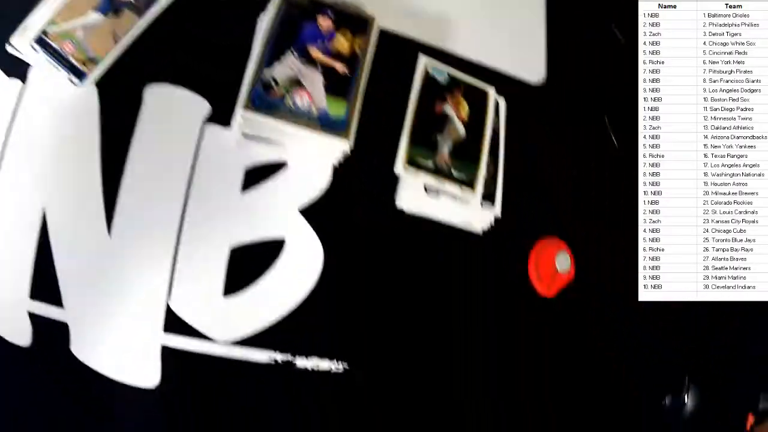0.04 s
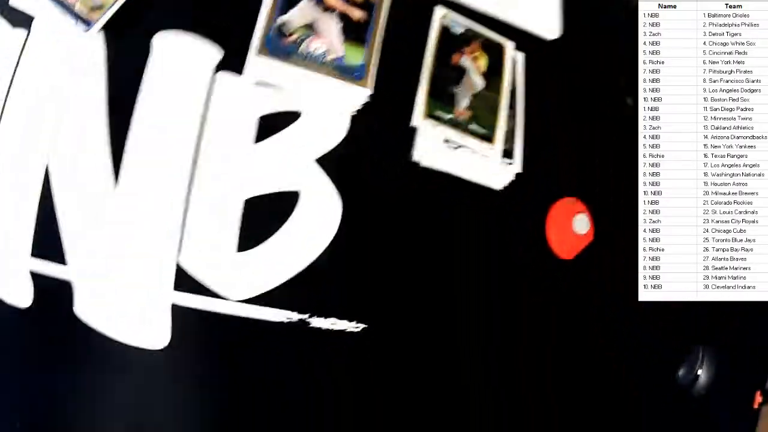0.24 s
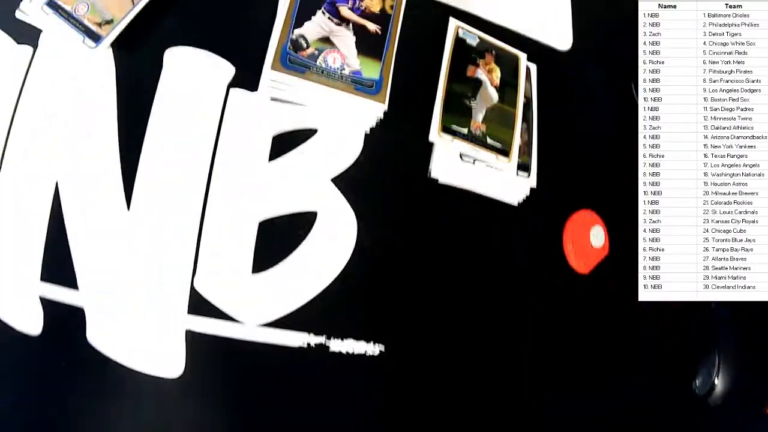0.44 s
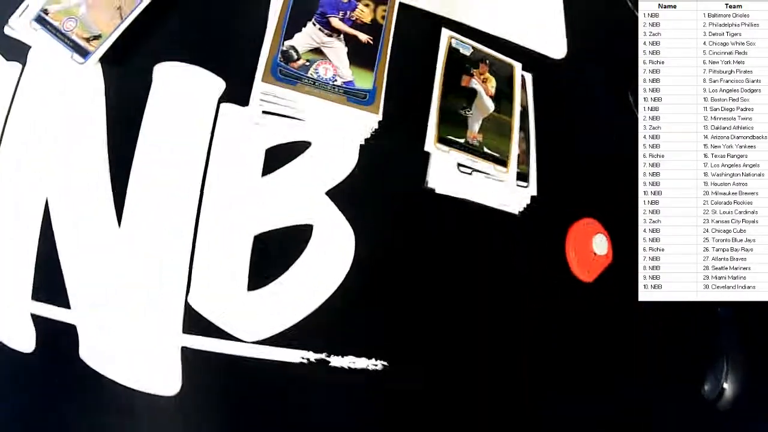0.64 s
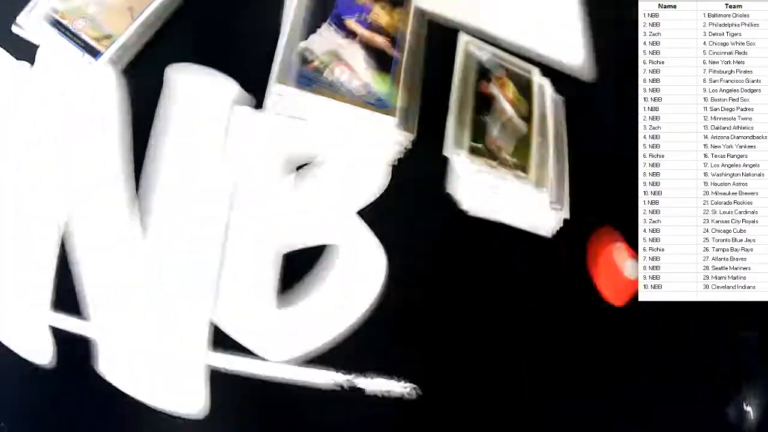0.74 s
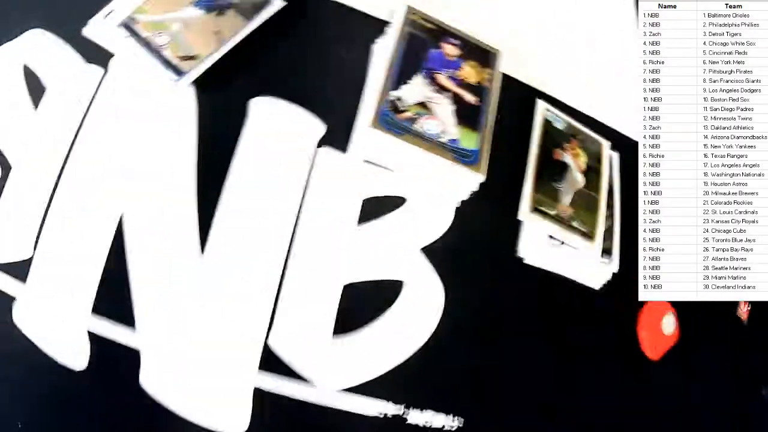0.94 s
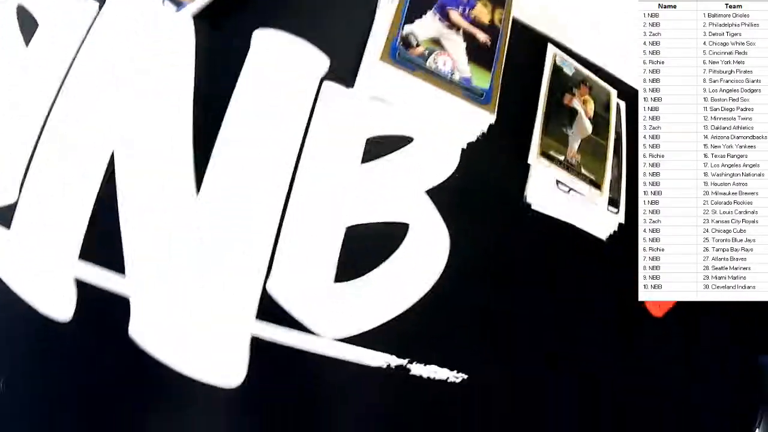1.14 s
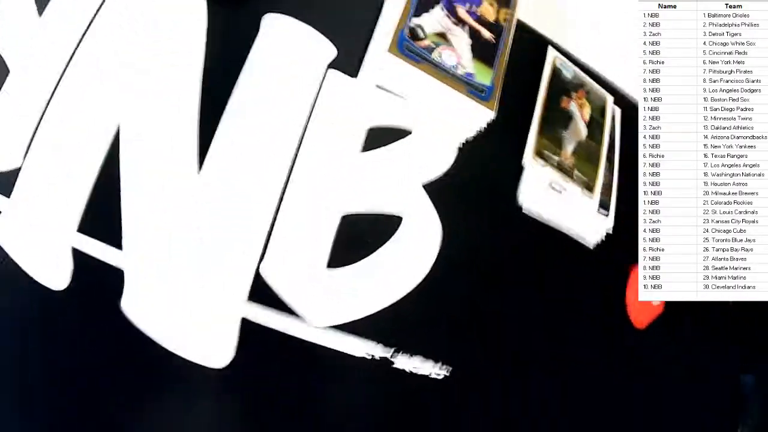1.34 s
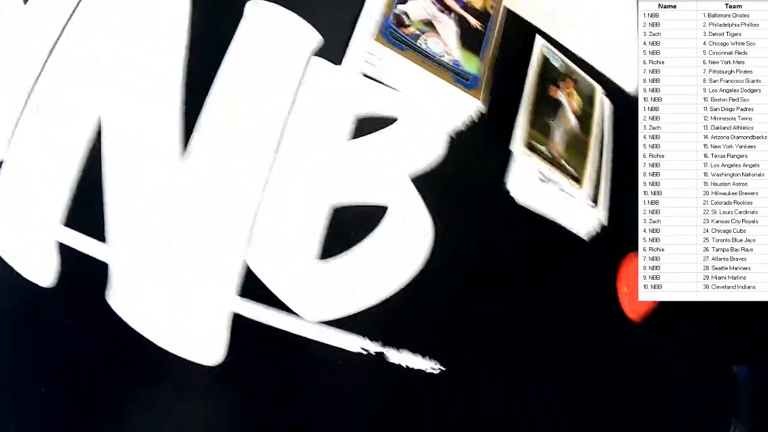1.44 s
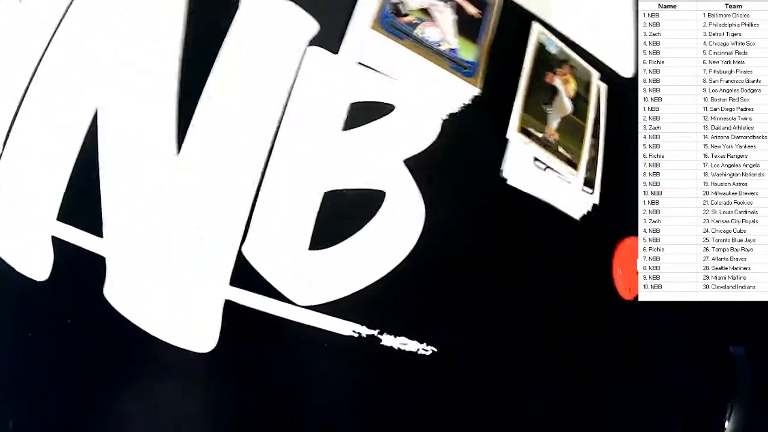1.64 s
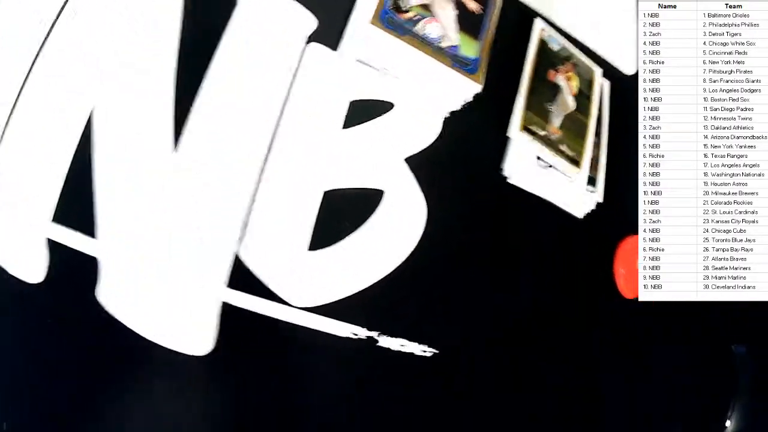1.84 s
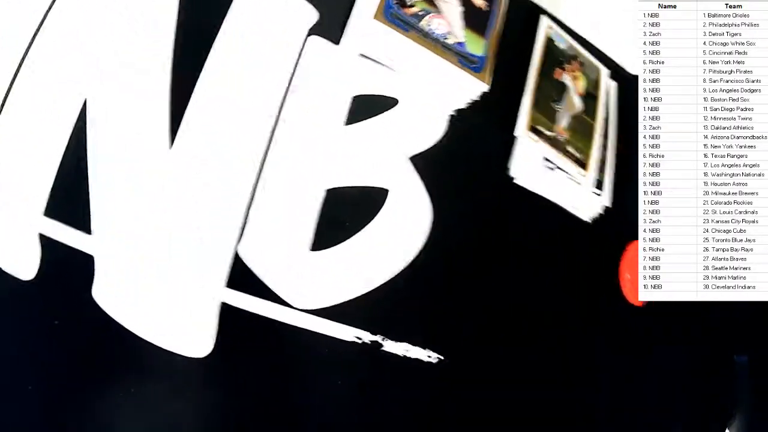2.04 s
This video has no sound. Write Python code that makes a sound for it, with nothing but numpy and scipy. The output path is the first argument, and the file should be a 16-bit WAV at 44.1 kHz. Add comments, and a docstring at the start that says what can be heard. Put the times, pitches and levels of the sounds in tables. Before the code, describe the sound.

Close handling of a camera on a jointed mount: soft rubbing, a hard plastic snap, a rattling burst of knocks and ratchet clicks, then quiet, one smaller click and faint creaks, in a quiet indoor room.

```python
"""A quiet room, with a camera on a jointed mount gripped and re-aimed right at its built-in microphone.
Behind it lie room tone, hiss and mains hum, made from shaped noise and steady sines.
Thumps and sways ring the mount's low modes; squeaks and groans are unsteady sines of the arm.
Rubs feed random stick-slip clicks to the plastic housing's modes; snaps, ratchets and knocks strike them.
A faint decaying noise tail adds the walls, and the hardest knocks overload the microphone."""
import sys
import numpy as np
from scipy import signal
from scipy.fft import rfft, irfft
from scipy.io import wavfile

SR = 44100
rng = np.random.default_rng(int(sys.argv[2]) if len(sys.argv) > 2 else 0)


def unload_audio(sound):
    """Save the sound as a 16-bit wav file, at the path given as the first command line argument."""
    columns = np.transpose(np.atleast_2d(sound))
    # keep every value between -1 and 1, then stretch to whole-number steps
    steps = np.round(np.clip(columns, -1, 1) * 32767)
    wavfile.write(sys.argv[1], SR, steps.astype(np.int16))


N = 92610
T = np.arange(N) / SR

# Housing modes in four families, from the shell's hollow knock up to its fine tick.
# Each row: frequency in Hz, relative level in dB, t60 in seconds when knocked.
HOLLOW = [(518.3, -17.5, 0.042), (700.4, -7.5, 0.031), (772.3, -2, 0.025), (871, -1.5, .038),
          (967.5, 0.5, .032), (1154, -5.5, 0.036), (1244, -15, 0.028)]
CLACK = [(1707, -8, 0.018), (1849, -3, 0.023), (2006.6, -0.5, 0.022), (2151, 0, 0.019), (2313, -5, .038),
         (2702, -7, 0.024), (2979, -10, 0.049)]
RING = [(3260, -11, .026), (3680, -6, .022), (3785, 0, .036), (3870, -1, .028), (4000, -8, .02)]
TICK = [(4800, -2, .006), (5400, 0, .008), (6500, -5, .005), (7200, -5, .006), (8100, -4, .009),
        (8950, -5, .008), (11200, -5, .008), (12500, -10, .004)]
FAMILIES = (HOLLOW, CLACK, RING, TICK)
# Span of each family. Each row: low edge in Hz, high edge in Hz.
FAMILY_BANDS_HZ = [(400, 1840), (1600, 2509), (3150, 4300), (4700, 40000)]

COLOUR_SPREAD_DB = 2.5  # mode strengths differ from blow to blow
GRIP_DETUNE = 0.008  # share by which the changing grip shifts each mode
PHASE_SPREAD_RAD = 0.5


def from_db(db):
    """Decibels to gain."""
    return 10 ** (np.asarray(db) / 20)


def rms_one(x):
    """Scale to an rms of one."""
    return x / np.sqrt(np.mean(x ** 2) + 1e-20)


def through(x, response):
    """Pass a signal through an impulse response."""
    return signal.fftconvolve(x, response)[:N]


def add(out, start, x):
    """Mix x into out from a start in seconds, held inside the scene."""
    i = int(np.clip(start * SR, 0, N - 1))
    out[i:i + len(x)] += x[:N - i]


def band(x, edges_hz, order=3):
    """Keep the sound between two frequencies."""
    edges_hz = np.clip(edges_hz, 10, 0.45 * SR)
    return signal.sosfilt(signal.butter(order, edges_hz, "band", fs=SR, output="sos"), x)


def struck(modes, edges_hz, spread_db=0, detune=0, size=11000, count=200):
    """Decaying modes after one varied blow, with unit rms over the first count samples."""
    t = T[:size]
    ringing = np.zeros(size)
    for k, (hz, db, t60) in enumerate(modes):
        strength, shift, phase = rng.normal(size=3)
        decay = from_db(db + spread_db * strength - 60 * t / t60)
        angle = 2 * np.pi * hz * (1 + detune * shift) * t + PHASE_SPREAD_RAD * phase
        ringing += (-1) ** k * decay * np.sin(angle)  # neighbouring modes alternate in sign
    ringing = band(ringing, edges_hz)
    return ringing / np.sqrt(np.mean(ringing[:count] ** 2))


def background():
    """Room tone and microphone hiss are shaped noise; mains hum is a few steady sines."""
    # Spectrum of the quiet room. Each row: frequency in Hz, relative level in dB.
    floor = [(25, -8.5), (87, -13.5), (190, -11), (285, -18.5), (380, -11), (1150, -13), (1600, -23.5),
             (2400, -12.5), (2900, -29), (3850, -20), (4700, -34.5), (13000, -28), (16000, -45.5)]
    # Mains hum. Each row: frequency in Hz, rms level in dB.
    hum_lines = [(59.5, -70.5), (119, -79), (241, -81.5)]
    floor_db = -67.5  # rms
    hz, db = np.transpose(floor)
    log_hz = np.log(np.fft.rfftfreq(N, 1 / SR) + 1)
    shape = from_db(np.interp(log_hz, np.log(hz), db))
    hiss = from_db(floor_db) * rms_one(irfft(rfft(rng.standard_normal(N)) * shape, N))
    hum = sum(from_db(level) * rms_one(np.sin(2 * np.pi * f * T)) for f, level in hum_lines)
    return hiss + hum


def room(x):
    """Diffuse reflections from the walls: a faint, decaying noise tail."""
    room_db, room_t60_s = -24.5, 0.11
    tail = rng.standard_normal(N) * from_db(-60 * T / room_t60_s)
    return from_db(room_db) * through(x, tail / np.linalg.norm(tail))


def mount():
    """Shoves ring the mount's low modes as thumps, and the whole arm rocks at one slow mode."""
    # Low modes of the mount. Each row: frequency in Hz, relative level in dB, t60 in seconds.
    mount_modes = [(56.6, -12, 0.089), (123, 6, 0.047), (181, -1.5, 0.1), (252, 2.5, 0.048),
                   (320.5, 1, 0.086), (392, 6.5, 0.067)]
    # Thumps are soft, so they keep to one band: low edge in Hz, high edge in Hz.
    mount_band_hz = (55, 310)
    # Shoves on the mount. Each row: start in seconds, early rms level in dB.
    thumps = [(.233, -32), (.27, -48), (0.607, -33.5), (0.623, -34), (.655, -39), (0.6853, -32.5),
              (.711, -39), (0.761, -51)]
    # Rocking of the whole arm. Each row: start in seconds, early rms level in dB.
    sways = [(.614, -45), (.709, -40.5)]
    sway_hz, sway_t60_s = 39, 0.24
    out = np.zeros(N)
    for start, db in thumps:
        thump = struck(mount_modes, mount_band_hz, COLOUR_SPREAD_DB, count=500)
        add(out, start, from_db(db) * thump)
    for start, db in sways:
        sway = struck([(sway_hz, 0, sway_t60_s)], (28, 90), count=1300)
        add(out, start, from_db(db) * sway)
    return out


def friction_notes(rows, sag=0):
    """Friction makes one unsteady note of the arm swell and fade, its pitch sagging by a share."""
    pitch_waver = 0.018  # rms share of the pitch
    pole = np.exp(-2 * np.pi * 100 / SR)  # waver slows to below about 100 Hz
    out = np.zeros(N)
    for start, length, hz, db in rows:
        progress = np.clip((T - start) / length, 0, 1)
        waver = pitch_waver * rms_one(signal.lfilter([1], [1, -pole], rng.standard_normal(N)))
        pitch = hz * (1 + waver + sag * (0.5 - progress))
        note = rms_one(np.sin(2 * np.pi * np.cumsum(pitch) / SR))
        out += from_db(db) * np.sin(np.pi * progress) ** 2 * note
    return out


def groans():
    """The arm groans as it flexes, each pitch falling as the push eases."""
    # Each row: start in seconds, length in seconds, mid-note pitch in Hz, peak rms level in dB.
    groan_rows = [(.54, 0.05, 185, -58), (1.238, .06, 375, -54), (1.245, .06, 100, -56),
                  (1.295, .09, 105, -52.5), (1.42, .06, 50, -57.5), (1.58, 0.08, 305, -57),
                  (1.655, 0.049, 125, -52.5)]
    return friction_notes(groan_rows, sag=0.23)


def squeaks():
    """The arm sings under friction, each note wavering about one pitch."""
    # Each row: start in seconds, length in seconds, pitch in Hz, peak rms level in dB.
    squeak_rows = [(.08, .09, 815, -39.5), (.273, 0.019, 2020, -20.5), (.3, 0.34, 3870, -57),
                   (.47, 0.092, 1200, -47.5), (.798, 0.15, 824, -50), (1.296, 0.047, 3806, -44),
                   (1.309, 0.042, 824, -38.5), (1.573, 0.054, 824, -36.5), (1.573, .065, 2370, -43),
                   (1.574, 0.035, 630, -41), (1.908, 0.028, 3300, -58)]
    return friction_notes(squeak_rows)


def slips(size):
    """Random stick-slip clicks of uneven strength and either sign."""
    slips_per_s, slip_spread_db = 1800, 3
    excess = np.minimum(rng.exponential(1, size), 4)
    strengths = from_db(slip_spread_db * excess) * rng.choice([-1, 1], size)
    return strengths * (rng.random(size) < slips_per_s / SR)


def stroke(start, length):
    """Envelope of one rub: swell, hold, release."""
    attack_s, release_s = 0.02, 0.028
    swell = np.clip((T - start) / attack_s, 0, 1)
    release = np.clip((start + length - T) / release_s, 0, 1)
    return swell * release


def rubs(size=12000):
    """Fingers and joint slide in stick-slip, driving the housing modes and rumbling in the mount."""
    # Each row: start in seconds, length in seconds, hollow, clack, ring and tick rms levels in dB.
    rub_rows = [ (-.02, 0.071, -52.5, -57, -45, -69.5), (0.028, 0.079, -43, -42, -56.5, -74),
                (0.061, 0.07, -40.5, -36.5, -47, -76), (0.106, 0.076, -49, -62.5, -66, -76.5),
                (0.162, 0.17, -54.5, -61, -71.5, -80), (0.255, 0.057, -33, -32.5, -60, -88),
                (0.287, 0.12, -51, -49.5, -53.5, -77), (0.345, 0.032, -50.5, -40, -69, -74),
                (0.368, 0.16, -68.5, -61, -57.5, -81), (0.483, 0.067, -52.5, -44, -53.5, -77),
                (0.527, 0.17, -49, -47, -48.5, -73), (0.61, 0.13, -42, -38.5, -42, -60.5),
                (0.721, 0.091, -50, -62.5, -73.5, -75.5), (1.022, 0.041, -61, -65.5, -82, -89.5),
                (1.24, 0.089, -48, -51.5, -73.5, -84), (1.318, 0.17, -56.5, -60.5, -74, -84),
                (1.573, 0.055, -41, -49, -65, -80), (1.796, 0.12, -67.5, -67, -68.5, -95.5),
                (1.903, 0.057, -61, -60, -61, -83), (1.937, 0.086, -77, -71.5, -67.5, -83),
                (2.024, 0.047, -40, -49.5, -59, -88), (2.053, 0.1, -53.5, -52.5, -75, -78.5)]
    light_touch_ring = 2.2  # factor on t60: a sliding finger damps the housing less than a knock
    colour_db = 3  # mode strengths differ from rub to rub
    rumble_db, rumble_follows = -40, 0.57  # share of the rub's swing in level
    out, pressure = np.zeros(N), np.zeros(N)
    for start, length, *levels in rub_rows:
        envelope, scrape = stroke(start, length), np.zeros(N)
        for modes, edges, db in zip(FAMILIES, FAMILY_BANDS_HZ, levels):
            freer = [(hz, level, t60 * light_touch_ring) for hz, level, t60 in modes]
            ringing = struck(freer, edges, colour_db, GRIP_DETUNE, size=3000)
            rubbed = signal.fftconvolve(slips(size), ringing, "valid")
            add(scrape, start, from_db(db) * rms_one(rubbed))
        out += envelope * scrape
        pressure += from_db(levels[0]) * envelope
    rumble = rms_one(band(slips(N), (110, 330), order=2))
    return out + from_db(rumble_db) * pressure ** rumble_follows * rumble


def contacts(size=900, count=260):
    """Each sharp contact is a click with a short crunch of micro-slips that rings the housing."""
    # Each row: start in seconds, then hollow, clack, ring and tick early rms levels in dB.
    contact_rows = [ (.0455, -43, -59, -50, -81), (.2258, -28, -34, -66, -83),
                    (.2295, -29.5, -19, -48, -64), (0.2332, -12.5, -12.5, -32, -52.5),
                    (.236, -6, -8.5, -69, -32.5), (.2445, -20.5, -38, -52, -66),
                    (0.2654, -28, -32, -67, -85.5), (0.2762, -23.5, -25, -64, -83),
                    (0.2861, -33, -43, -76, -74), (0.5903, -47, -35.5, -29.5, -52.5),
                    (0.599, -39, -38, -41.5, -54), (0.6101, -8.5, -21.5, -29.5, -40.5),
                    (0.6161, -6.5, -18, -33, -41), (0.6269, -21, -25.5, -34, -51),
                    (.6392, -26, -28.5, -24, -57), (.6435, -28, -39, -35, -56),
                    (0.6494, -38, -24.5, -25.5, -56), (0.655, -16.5, -19.5, -22.5, -47.5),
                    (0.66, -38, -25, -20, -55), (0.6675, -34, -25, -32, -58.5),
                    (.6757, -41, -34, -24.5, -46), (.6825, -22.5, -34, -46, -69),
                    (0.687, -19, -17, -45, -61.5), (0.6932, -26, -32.5, -21, -41.5),
                    (0.706, -22.5, -37, -42.5, -56.5), (.7108, -24, -23.5, -26.5, -57),
                    (0.7138, -51, -33, -29, -50), (.7595, -35.5, -50.5, -79, -73),
                    (1.2698, -46.5, -58, -59.5, -66.5), (1.3022, -17, -20, -46.5, -78),
                    (1.3075, -25.5, -25.5, -46, -93), (1.3598, -54.5, -58, -62.5, -72),
                    (1.4023, -41.5, -38.5, -73, -76), (1.438, -46, -56, -78.5, -75),
                    (1.4454, -44, -51.5, -76, -77), (1.5818, -39, -43.5, -78.5, -74.5),
                    (1.6989, -48, -49.5, -69, -83), (1.727, -48.5, -59.5, -75.5, -91),
                    (1.8138, -62, -57, -63.5, -79.5), (1.9815, -45, -59, -66, -79),
                    (2.0329, -55, -53, -53, -71), (2.057, -48, -66, -47, -74)]
    # Strength of the micro-slips relative to the click, one for each family.
    crunch_shares = (0.351, .45, 0.698, 1.602)
    crunch_s = 0.0026  # time for the crunch to fall to 1/e
    out = np.zeros(N)
    for start, *levels in contact_rows:
        for modes, edges, crunch, db in zip(FAMILIES, FAMILY_BANDS_HZ, crunch_shares, levels):
            force = rng.standard_normal(size) * np.exp(-T[:size] / crunch_s)
            force *= crunch / np.linalg.norm(force)
            force[0] += 1  # the click itself
            ringing = struck(modes, edges, COLOUR_SPREAD_DB, GRIP_DETUNE)
            blow = signal.fftconvolve(force, ringing)
            add(out, start, from_db(db) * blow / np.sqrt(np.mean(blow[:count] ** 2)))
    return out


def scene():
    """Handling noise close to the microphone, over the quiet room."""
    handling = mount() + groans() + squeaks() + rubs() + contacts()
    return (background() + room(handling) + handling)[None]


def record(dry):
    """The built-in microphone flattens the hardest peaks, and the top of the treble is cut."""
    overload, knee = 0.71, 8  # ceiling as a share of full scale; a higher knee bends later
    cutoff_hz = 16900
    clipped = dry / (1 + np.abs(dry / overload) ** knee) ** (1 / knee)
    return signal.sosfilt(signal.cheby2(12, 60, cutoff_hz, fs=SR, output="sos"), clipped)


dry = scene()
out = record(dry)
unload_audio(out)
```